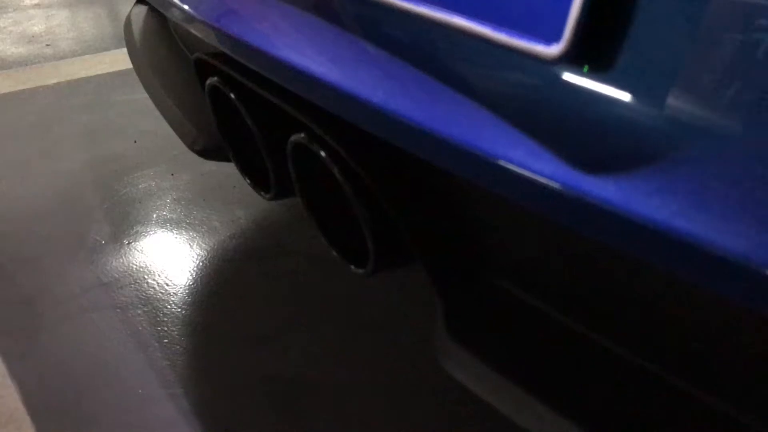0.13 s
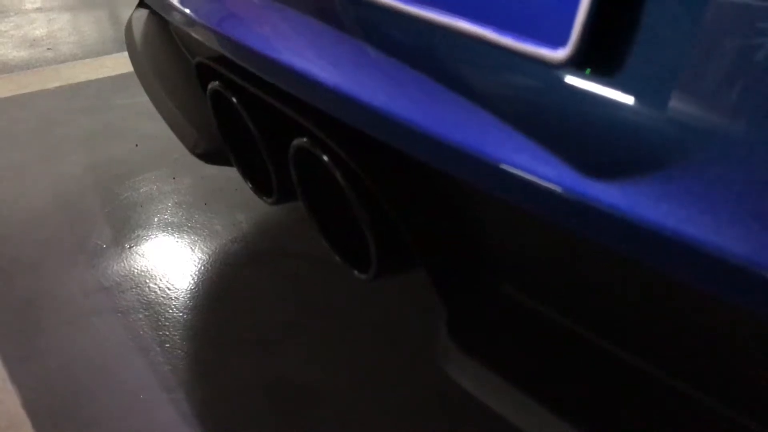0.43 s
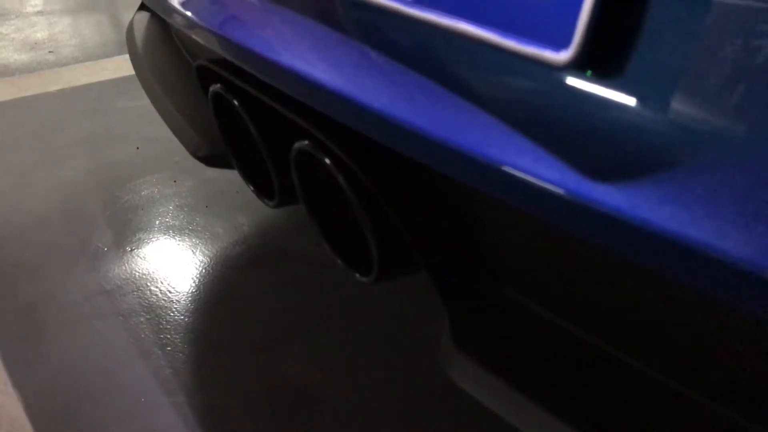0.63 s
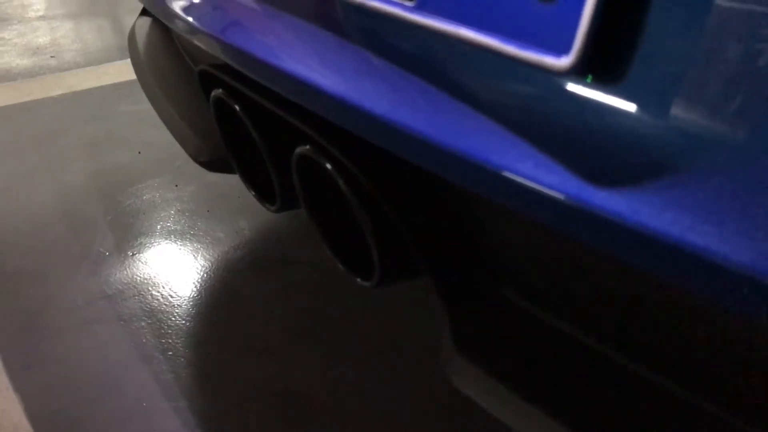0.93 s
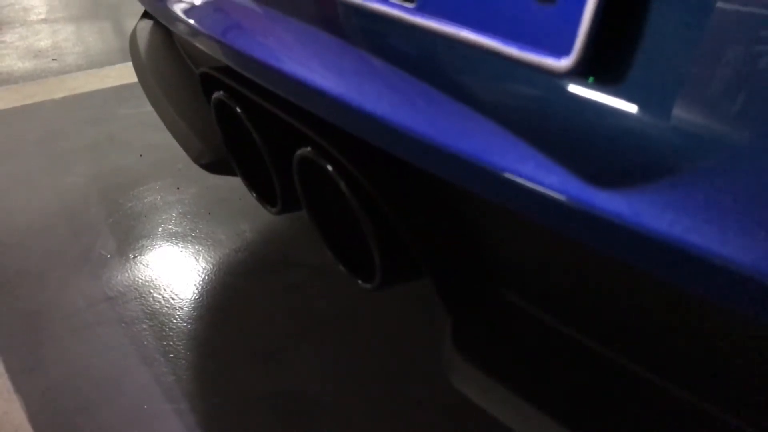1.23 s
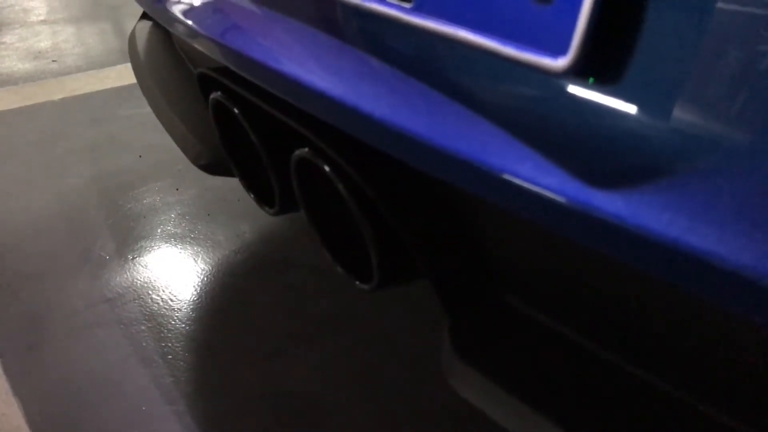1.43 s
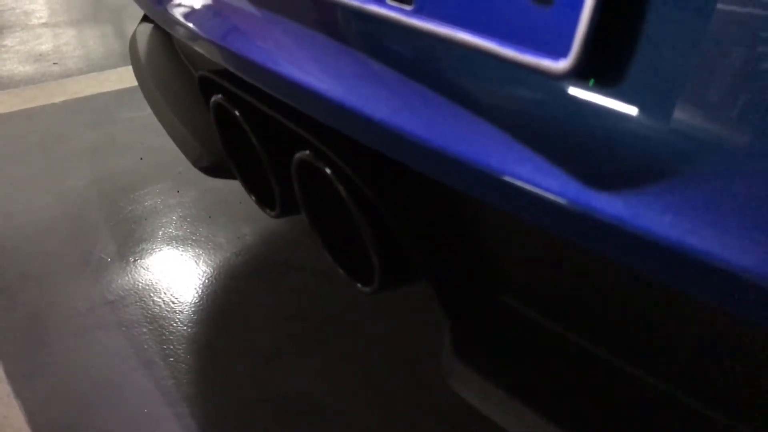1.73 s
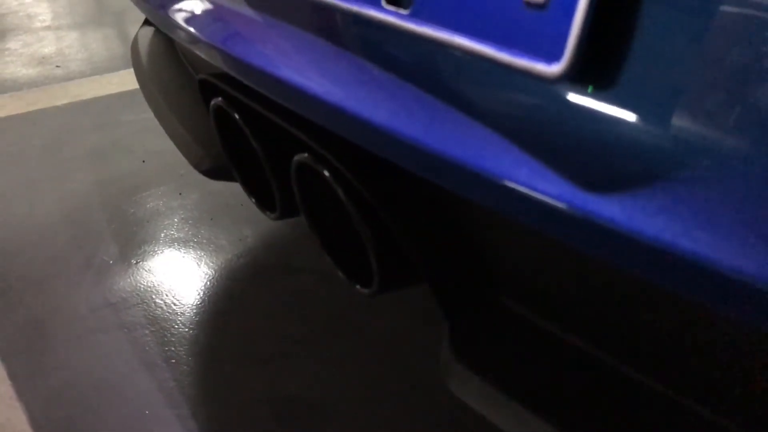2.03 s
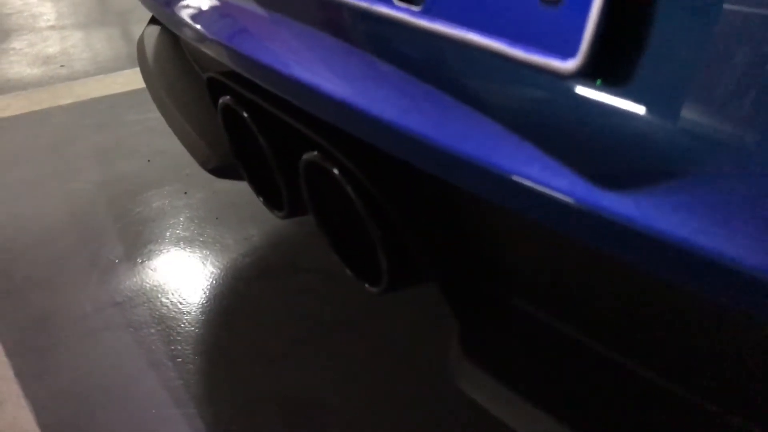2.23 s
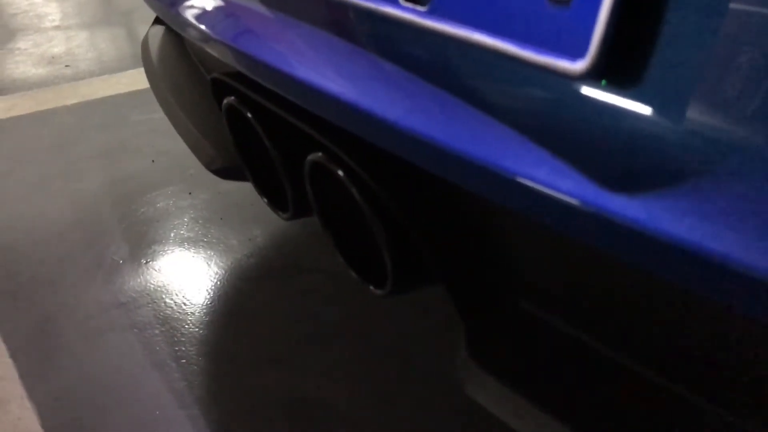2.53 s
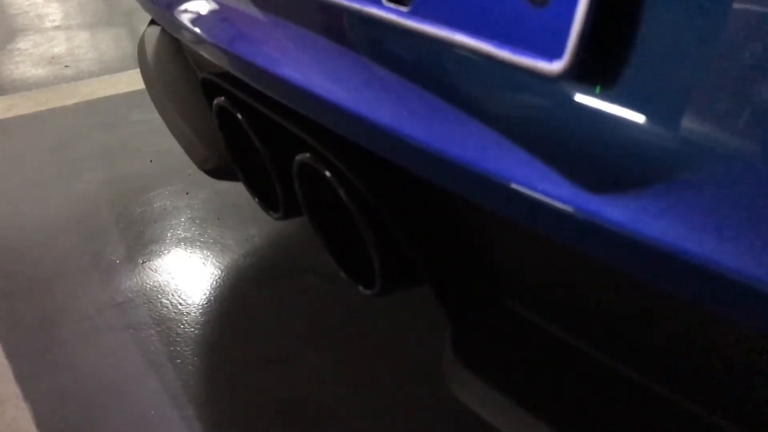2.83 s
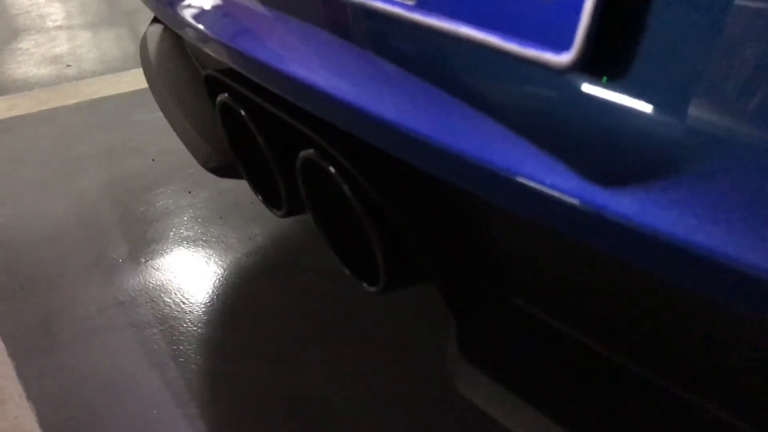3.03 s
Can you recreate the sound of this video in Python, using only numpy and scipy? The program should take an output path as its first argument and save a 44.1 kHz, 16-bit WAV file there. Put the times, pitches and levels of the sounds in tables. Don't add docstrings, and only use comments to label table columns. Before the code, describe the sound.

A car engine idles steadily, heard close to the exhaust pipes in a hard-walled garage: fast low thumps with occasional weak beats, soft gas puffs, repeating metallic valve ticks, and short sharp hisses, strongest after two seconds.

```python
import sys
import numpy as np
from scipy import signal
from scipy.fft import rfft, irfft, next_fast_len
from scipy.io import wavfile
from scipy.ndimage import uniform_filter1d

SR = 44100
rng = np.random.default_rng(int(sys.argv[2]) if len(sys.argv) > 2 else 0)


def decibels_to_gain(level_db):
    exponent = np.asarray(level_db, float) / 20
    return 10 ** exponent


def output_pcm(signal):
    pcm = np.clip(np.atleast_2d(signal).T, -1, 1) * 32767
    wavfile.write(sys.argv[1], SR, np.round(pcm).astype(np.int16))


N = 139797
T = np.arange(N) / SR


def unit(x):
    return x / np.sqrt(np.mean(x ** 2) + 1e-20)


def filtered(x, response):
    m = next_fast_len(N + SR // 2)
    return irfft(rfft(x, m) * response(np.fft.rfftfreq(m, 1 / SR)), m)[:N]


def resonances(modes, f, sign=-1):
    total = 0
    for k, (centre, width, db) in enumerate(modes):
        damping = 1j * f * width
        total = total + sign ** k * decibels_to_gain(db) * damping / (centre * centre - f * f + damping)
    return total


def noise(colour, patchy_db):
    z = signal.stft(rng.standard_normal(N + 512), nperseg=512)[2]
    field = uniform_filter1d(rng.standard_normal(z.shape), size=5, axis=0)
    field = uniform_filter1d(field, size=8, axis=1)
    x = signal.istft(z * decibels_to_gain(patchy_db * unit(field)), nperseg=512)[1][:N]
    hz, db = np.transpose(colour)
    return unit(filtered(x, lambda f: decibels_to_gain(np.interp(np.log(f + 1), np.log(hz), db, -120, -120))))


def train(times, sizes):
    at = np.round(times * SR).astype(int)
    keep = (at >= 0) & (at < N)
    return np.bincount(at[keep], sizes[keep], N)


def shaped(pulses, shape):
    return signal.fftconvolve(pulses, shape)[:N]


def garage(x):
    t60_s, level_db, first_echo_s = 0.5, -11, 0.006
    t = T[:SR // 2]
    tail = np.convolve(rng.standard_normal(len(t)), np.ones(3), "same")
    tail = tail * decibels_to_gain(-60 * t / t60_s) * (t > first_echo_s)
    return decibels_to_gain(level_db) * shaped(x, tail / np.linalg.norm(tail))


def engine_bay():
    # frequency in Hz, density in dB per Hz.
    bay_colour = [(900, -5), (1500, -5), (2400, -7.5), (3600, -4), (5200, -8.5), (7600, -12.5),
                  (12500, -16.5), (16300, -13.5)]
    # frequency in Hz, density in dB per Hz.
    rumble_colour = [(12, -12), (25, -5), (60, 3), (100, -19), (200, -1.5), (300, -21.5)]
    return decibels_to_gain(-39.5) * noise(bay_colour, patchy_db=1.0) + decibels_to_gain(-39) * noise(rumble_colour, patchy_db=2)


def leak_spits():
    # time in seconds, peak level in dB.
    spit_events = [
        (0.5924, -25.5),
        (0.8884, -35),
        (1.2684, -37),
        (1.3384, -38),
        (2.093, -24),
        (2.2433, -31.5),
        (2.391, -24),
        (2.839, -26.5),
        (2.991, -24),
    ]
    # frequency in Hz, density in dB per Hz.
    hiss_colour = [(500, -19), (2500, -4), (5500, -2.5), (8000, -2.5), (10500, 1), (12500, -4.5),
                   (14300, 1.5), (16300, -7.5)]
    lead_s, rise_s, hold_s, t60_s, level_db = 0.0011, 0.002, 0.007, 0.06, -6.5
    s, db = np.transpose(spit_events)
    t = T[:SR // 8]
    decay = decibels_to_gain(-60 * np.maximum(t - rise_s - hold_s, 0) / t60_s)
    shape = np.clip(t / rise_s, 0, 1) * decay
    return shaped(train(s - lead_s, decibels_to_gain(db + level_db)), shape) * noise(hiss_colour, patchy_db=0)


def valve_gear():
    # time into the cycle in ms, cover ring in dB, rattle in dB.
    contacts = [
        (3.78, -64, -40),
        (16.9, -52, -55),
        (41, -55, -38),
        (58.2, -64, -42),
        (71, -46, -53),
        (88.7, -62, -41.5),
        (105, -60, -69),
        (118, -54, -63),
        (140, -43.5, -51),
    ]
    pin_db = [-64, -55, -53, -64, -50, -54, -64, -54, -45]
    # frequency in Hz, width in Hz, level in dB.
    cover_modes = [(3460, 200, 3), (3860, 260, 3), (2680, 220, 4), (4430, 120, 7), (6400, 400, 8)]
    # frequency in Hz, density in dB per Hz.
    rattle_colour = [(1500, 1), (3000, -29), (4500, -1), (8000, -10), (12000, -4), (16300, -7)]
    cycle_s, scatter_s, scatter_db, rise_s = 0.14971, 0.00093, 1.5, 0.002
    cover_t60_s, rattle_t60_s, cover_level_db = 0.05, 0.041, 9.0
    pin_hz, pin_t60_s, pin_scatter_db = 5680, 0.05, 1.3

    ms, ring_db, rattle_db = np.transpose(contacts)
    cycles = np.arange(int(N / SR / cycle_s) + 1)
    s = (cycles[:, None] * cycle_s + ms / 1000).ravel()
    chance = rng.standard_normal((len(s), 3))
    s = s + scatter_s * chance[:, 0]
    t = T[:SR // 8]
    rise = 1 - np.exp(-t / rise_s)

    def burst(db, t60_s):
        return shaped(train(s, decibels_to_gain(db)), decibels_to_gain(-60 * t / t60_s) * rise)

    scrape = burst(np.resize(ring_db, len(s)) + scatter_db * chance[:, 1], cover_t60_s)
    scrape = scrape * rng.standard_normal(N)
    cover = decibels_to_gain(cover_level_db) * filtered(scrape, lambda f: resonances(cover_modes, f))

    rattle = burst(np.resize(rattle_db, len(s)) + scatter_db * chance[:, 2], rattle_t60_s)
    rattle = rattle * noise(rattle_colour, patchy_db=1.5)

    pin_ring = decibels_to_gain(-60 * t / pin_t60_s) * rise * np.sin(2 * np.pi * pin_hz * t)
    pin_levels = np.resize(pin_db, len(s)) + pin_scatter_db * chance[:, 2]
    pin = shaped(train(s, decibels_to_gain(pin_levels)), pin_ring)
    return pin + cover + rattle


def firings():
    # time in seconds, lateness of the firings in ms.
    lateness = [(.02, 0.8), (.2, -2), (.3, 1), (.45, -1), (.5, -0.2), (.67, -2.5), (.77, 0.5), (.85, -1),
                (.97, -1.4), (1.15, -1), (1.2, 1.5), (1.32, 1.5), (1.72, .5), (1.82, 1.4), (1.95, 0),
                (2.12, 1.2), (2.5, -2), (3.02, -0.43)]
    # time in seconds, level in dB against the usual firing.
    odd_firings = [(.024, -3.9), (.149, -2.2), (.198, -3.3), (.223, -1.6), (.398, -1.7), (.448, -11.6),
                   (.648, -11.2), (.697, -1.6), (.797, 2.1), (.822, -8.4), (.847, -2.1), (.897, -2.4),
                   (.997, 1.8), (1.022, 2.4), (1.047, -2.1), (1.147, -12.7), (1.346, -3.5), (1.371, 2.1),
                   (1.521, 2.2), (1.646, -2.9), (1.72, -1.9), (1.82, 1.8), (1.97, 1.9), (2.269, 2.5),
                   (2.394, -2.5), (2.494, -4), (2.718, 1.8), (2.893, -5.8), (3.093, -2.6), (3.143, -3.7)]
    first_s, interval_s = 0.0238, 0.02495
    scatter_db, scatter_ms, weak_early_ms_per_db = 1.1, 0.093, 0.18
    even = first_s + interval_s * np.arange(-1, int(N / SR / interval_s) + 1)
    chance = rng.standard_normal((len(even), 3))
    db = scatter_db * chance[:, 0]
    for s, odd_db in odd_firings:
        db[np.argmin(abs(even - s))] = odd_db
    ms = np.interp(even, *np.transpose(lateness)) + scatter_ms * chance[:, 1]
    ms = ms + weak_early_ms_per_db * np.minimum(db, 0)
    return np.maximum(even + ms / 1000, 0), db, chance[:, 2]


def exhaust_thump(s, db, chance):
    # frequency in Hz, width in Hz, level in dB.
    silencer_modes = [(53.2, 32.9, 50.3), (38.2, 71.9, 44.6), (89.4, 26.3, 44.6), (123.2, 25.1, 51.1)]
    # frequency in Hz, width in Hz, level in dB.
    tip_modes = [(211.5, 17.7, 14.5), (334.4, 10, 6), (451, 13.3, 4), (778, 280, -3), (1170, 440, -5),
                 (1593, 177, -8)]
    # frequency in Hz, width in Hz, level in dB.
    knock_modes = [(1030, 60, 3), (1970, 100, -4)]
    level_db, smooth_hz, open_end_hz = 0.13, 98.6, 73.4
    push_hz, push_follows, push_scatter_db = 84, 0.16, 2.5
    tip_delay_s, tip_scatter_db, knock_scatter_db = 0.001533, 3.5, 3.5

    def pipe(f):
        smoothing = 1 / (1 + 1j * f / smooth_hz) ** 2
        radiation = (1j * f / (open_end_hz + 1j * f)) ** 2
        return decibels_to_gain(level_db) * resonances(silencer_modes, f) * smoothing * radiation

    thump = filtered(train(s, decibels_to_gain(db)), pipe)
    push_db = push_follows * db + push_scatter_db * np.roll(chance, shift=7)
    correction = train(s, decibels_to_gain(push_db) - decibels_to_gain(db))
    push = filtered(correction, lambda f: pipe(f) / (1 + (f / push_hz) ** 4))
    cracks = train(s + tip_delay_s, decibels_to_gain(db + tip_scatter_db * chance[::-1]))
    crack = filtered(cracks, lambda f: resonances(tip_modes, f))
    knocks = train(s + tip_delay_s, decibels_to_gain(knock_scatter_db * np.roll(chance, shift=13)))
    knock = filtered(knocks, lambda f: resonances(knock_modes, f))
    return thump + push + crack + knock


def exhaust_puff(s, db, chance):
    # frequency in Hz, density in dB per Hz.
    gas_colour = [(150, -23), (240, -14.5), (330, -2), (666, -8.5), (1040, -8.5), (1250, -9.5),
                  (3000, -16.5), (4200, -67)]
    # frequency in Hz, width in Hz, level in dB over the puff.
    shell_modes = [(867, 70, -3), (1089, 60, 1.5), (1156, 60, -3), (1977, 100, .3)]
    level_db, delay_s, rise_s, fall_s = -41.5, 0.00094, 0.001, 0.032
    steady_flow, follows, scatter_db = 0.51, 0.4, 2.5
    t = T[:SR // 10]
    blow = (1 - np.exp(-t / rise_s)) * np.exp(-t / fall_s)
    gate = unit(shaped(train(s + delay_s, decibels_to_gain(follows * db + scatter_db * chance)), blow))
    gas = noise(gas_colour, patchy_db=2.3) * unit(gate + steady_flow)
    return decibels_to_gain(level_db) * filtered(gas, lambda f: 1 + resonances(shell_modes, f, sign=1))


def scene():
    far = engine_bay()
    s, db, chance = firings()
    near = leak_spits() + valve_gear() + exhaust_puff(s, db, chance)
    return (exhaust_thump(s, db, chance) + near + garage(near) + far)[None]


def low_pass(x):
    return signal.sosfilt(signal.butter(12, 16340, fs=SR, output="sos"), x)


def record(dry):
    # centre in Hz, width in Hz, share lost.
    mic_dip = (10500, 510, 0.35)
    soft_top, soft_knee, start_s, top_hz = 0.75, 4, 0.03625, 15860
    hz, width, lost = mic_dip
    soft = dry[0] / (1 + abs(dry[0] / soft_top) ** soft_knee) ** (1 / soft_knee)

    def microphone(f):
        return (1 - lost * np.exp(-((f - hz) / width) ** 2)) * (f < top_hz)

    return low_pass(filtered(soft * (T > start_s), microphone)[None])


dry = scene()
out = record(dry)
output_pcm(out)
```